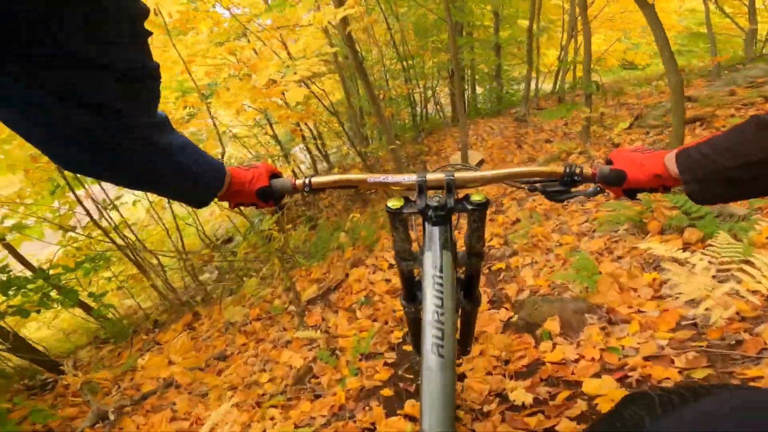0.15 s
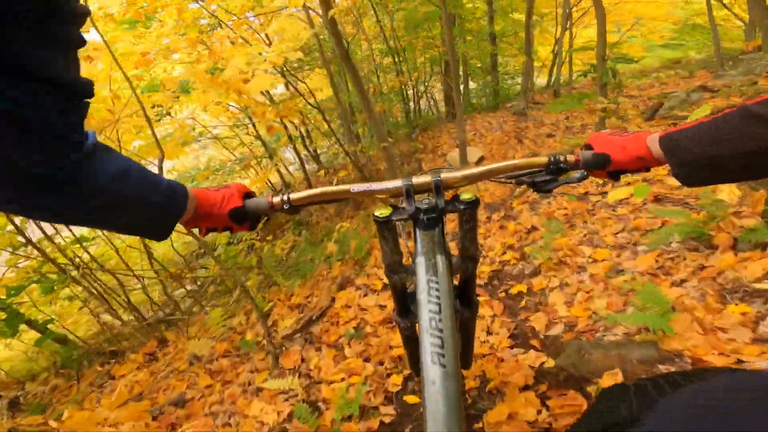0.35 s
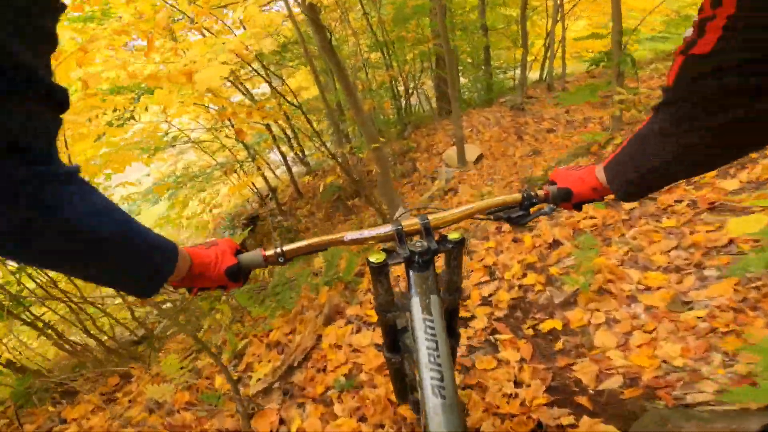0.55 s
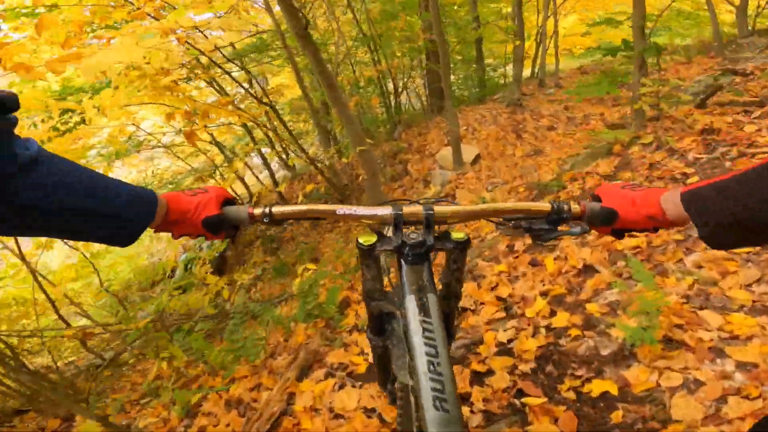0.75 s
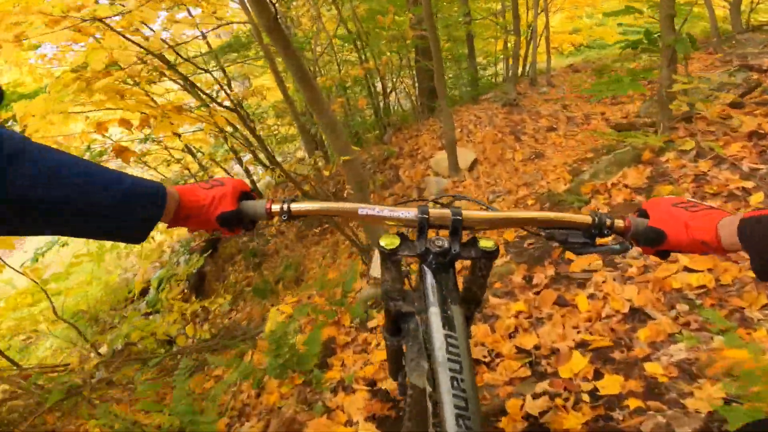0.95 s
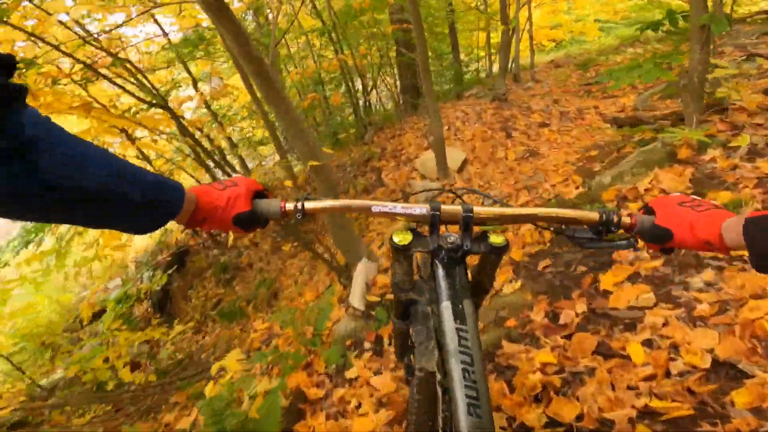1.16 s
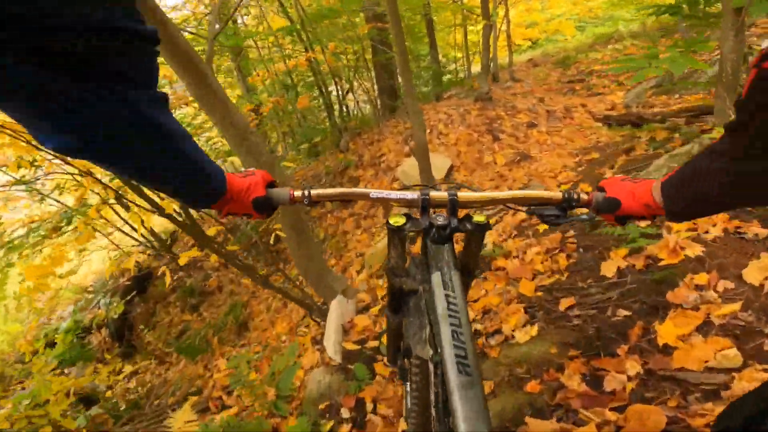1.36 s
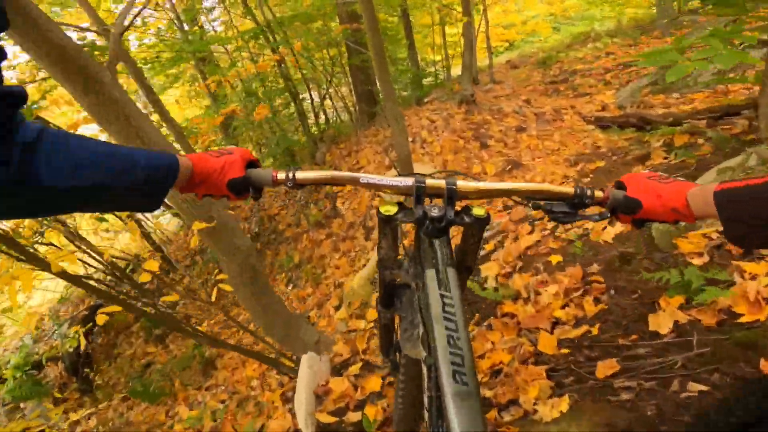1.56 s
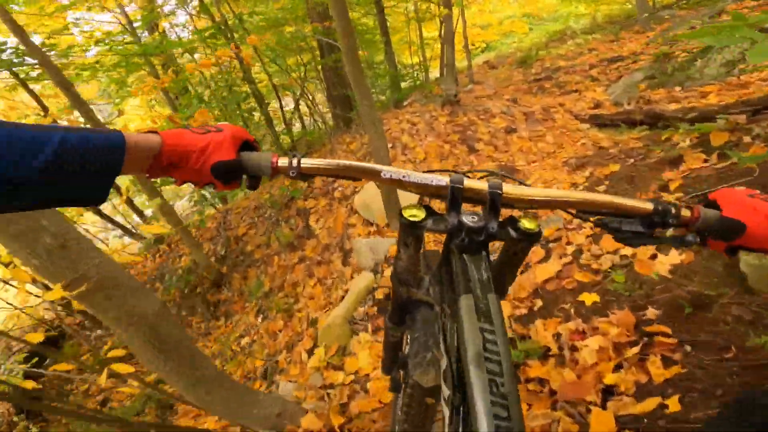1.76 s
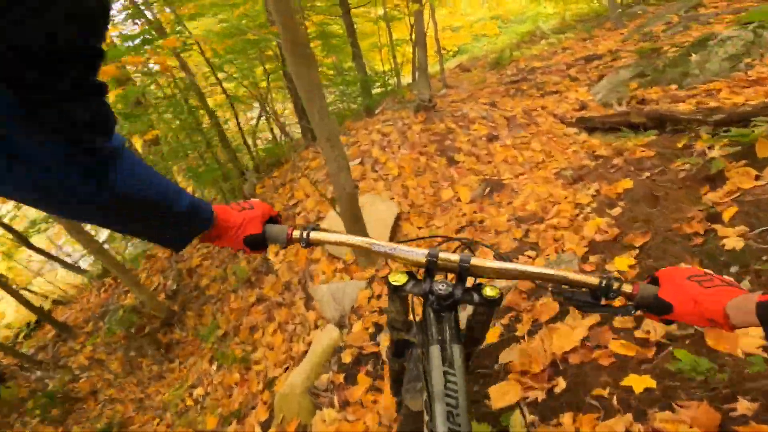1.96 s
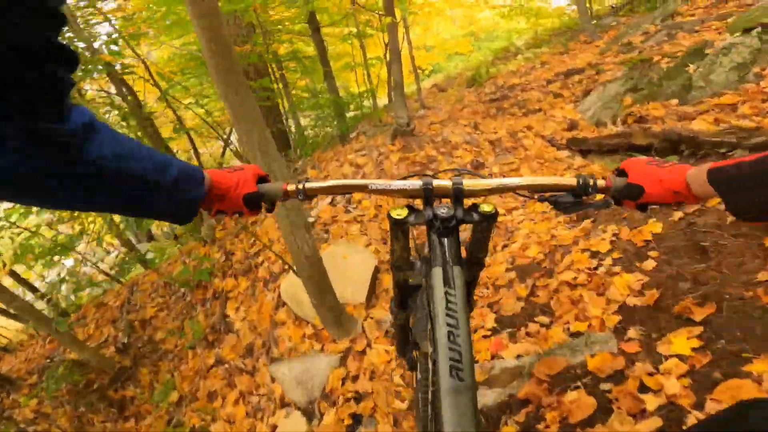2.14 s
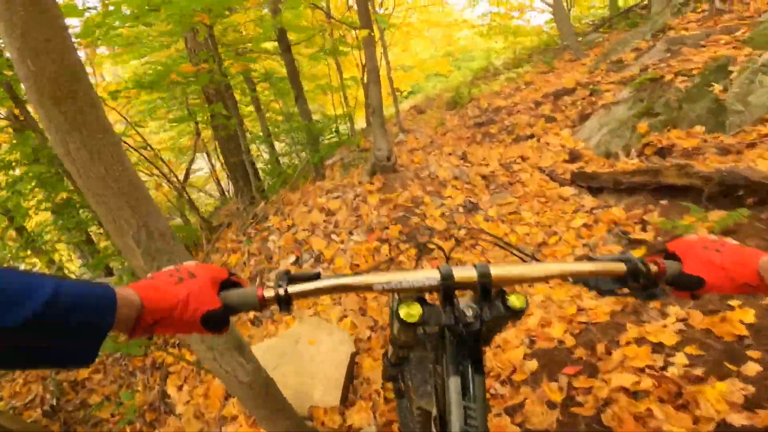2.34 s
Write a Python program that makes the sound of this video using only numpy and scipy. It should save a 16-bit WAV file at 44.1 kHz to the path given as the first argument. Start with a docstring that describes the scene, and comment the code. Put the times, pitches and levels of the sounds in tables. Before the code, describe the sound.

A mountain bike crunches through deep dry leaves on a forest trail, heard from the rider's chest. Bumps bring rattles, knocks and low thuds, twigs snap and the tyres buzz briefly. After a late thud, the leaves swell loudest.

```python
"""A mountain bike rolls down a forest trail deep in dry leaves, heard from the rider's chest.
From the start the tyres crush leaves and stems; each bump crunches harder, rattles the bike,
drums the tyres and shakes the camera. The frame knocks and blows thud through the suspension.
Twigs snap from 0.28 s, and from 0.4 s the tyre knobs buzz over roots in short runs.
Near 2 s a rock thuds, then the leaves swell to their loudest."""
import sys
import numpy as np
from scipy import signal
from scipy.fft import rfft, irfft, next_fast_len
from scipy.io import wavfile
from scipy.ndimage import uniform_filter1d, map_coordinates

SR = 44100
rng = np.random.default_rng(int(sys.argv[2]) if len(sys.argv) > 2 else 0)


def bounce(signal):
    """Save signal as a 16-bit WAV file at the path given by the first command-line argument."""
    frames = np.transpose(np.atleast_2d(signal))
    limited = np.clip(frames, -1, 1)
    pcm = np.round(limited * 32767).astype(np.int16)
    wavfile.write(sys.argv[1], SR, pcm)


N = 110117
TIME_S = np.arange(N) / SR


def amp(db):
    return 10 ** (np.asarray(db) / 20)


def unit_rms(x):
    return x / np.sqrt(np.mean(x ** 2) + 1e-20)


def at_hz(points, hz):
    """Interpolate (frequency, value) points on a log axis."""
    freqs, values = np.transpose(points)
    return np.interp(np.log(hz + 1), np.log(freqs + 1), values)


def filtered(x, response):
    """Apply the gain response(hz)."""
    size = next_fast_len(N + 8192)
    return irfft(rfft(x, size) * response(np.fft.rfftfreq(size, 1 / SR)), size)[..., :N]


def impulse_response(spectrum, size=4096):
    """Minimum-phase response with the given spectrum."""
    cepstrum = irfft(np.log(amp(at_hz(spectrum, np.fft.rfftfreq(size, 1 / SR)))))
    cepstrum[1:size // 2] *= 2
    cepstrum[size // 2 + 1:] = 0
    return irfft(np.exp(rfft(cepstrum)))


def add(track, start_s, sound):
    i = max(round(start_s * SR), 0)
    track[i:i + len(sound)] += sound[:max(N - i, 0)]


def grains(spectrum, per_s, scatter_db, noise_share):
    """Tiny random impacts over smooth noise, rms 1."""
    hits = (rng.random(N) < per_s / SR) * np.sign(rng.standard_normal(N))
    hits *= amp(scatter_db * np.clip(rng.standard_normal(N), -2, 2))
    force = np.sqrt(1 - noise_share) * unit_rms(hits) + np.sqrt(noise_share) * rng.standard_normal(N)
    return unit_rms(signal.fftconvolve(force, impulse_response(spectrum))[:N])


def steadied(x, window_s):
    """Divide by the running rms."""
    return x / np.sqrt(np.abs(uniform_filter1d(x ** 2, int(window_s * SR))) + 1e-6)


def wobble(samples, knots_per_s=134.5):
    """Smooth random curve."""
    return map_coordinates(rng.standard_normal(1024), [np.arange(samples) * knots_per_s / SR], mode="wrap")


# leaf crackle spectrum (frequency [Hz], density [dB])
LEAF_SPECTRUM = [(200, -19), (600, -1), (1100, -1.5), (1900, -4.5), (3000, 0.5), (5000, 0), (7400, -4.5),
                 (8300, -11), (10500, -16), (13000, -19), (14500, -73)]
def leaves(gain):
    """Dry leaves crackle under the tyres, stems breaking among them."""
    return gain * (grains(LEAF_SPECTRUM, per_s=5000, scatter_db=10.5, noise_share=.36) + stems())


def stems(count=900, per_s=150, centre_hz=3522, spread_octaves=.8, cycles_per_20db=14):
    """Stems and small twigs break at random, each a tiny pitched tick."""
    out, t = np.zeros(N), TIME_S[:600]
    times_s = np.cumsum(rng.exponential(1, count)) / per_s
    for start_s, (pitch, size) in zip(times_s, np.clip(rng.standard_normal((count, 2)), -2, 2)):
        hz = centre_hz * 2 ** (spread_octaves * pitch)
        db = -3 + 6 * size + at_hz(LEAF_SPECTRUM, hz)
        add(out, start_s, amp(db - 20 * hz * t / cycles_per_20db) * np.sin(2 * np.pi * hz * t))
    return out


LEAF_REF_DB = -41
# shattering leaf spectrum (frequency [Hz], density [dB])
SHARD_SPECTRUM = [(1500, -30), (3500, -2.5), (5500, 0.5), (7500, 0), (8500, -5.5), (11000, -10),
                  (14000, -33)]
def shards(crunch_gain, db_per_db=1.51):
    """Leaves shatter under load: a bright hiss that grows faster than the crunch."""
    gain = amp(-52) * (crunch_gain / amp(LEAF_REF_DB)) ** db_per_db
    return gain * grains(SHARD_SPECTRUM, per_s=5000, scatter_db=2, noise_share=.36)


# deep litter envelope (time [s], level [dB])
LITTER_LEVELS = [(0, -49), (.25, -33.5), (.42, -38), (.56, -42), (.68, -37.5), (.85, -44.5), (.96, -35),
                 (1.08, -64), (1.32, -41), (1.6, -76), (1.95, -58), (2.12, -37.5), (2.5, -54)]
# deep litter spectrum (frequency [Hz], density [dB])
LITTER_SPECTRUM = [(300, -11), (900, -4.5), (1400, 8.5), (2200, 2), (3000, -2.5), (5000, -26)]
def litter():
    """Deep leaf litter gives way with a lower crunch."""
    gain = amp(np.interp(TIME_S, *np.transpose(LITTER_LEVELS)))
    return gain * grains(LITTER_SPECTRUM, per_s=700, scatter_db=8, noise_share=.57)


# chain and cable spectrum (frequency [Hz], density [dB])
RATTLE_SPECTRUM = [(150, -11.5), (400, -4.5), (620, -6.5), (790, -8.5), (900, -2), (1000, 0), (1120, -3.5),
                   (1250, -3), (1400, -12.5), (1700, -9.5), (2000, -12), (3000, -20.5), (6000, -37.5)]
def rattle(gain):
    """Chain and cables clatter and scrape."""
    return gain * grains(RATTLE_SPECTRUM, per_s=700, scatter_db=5, noise_share=.57)


# tyre spectrum (frequency [Hz], density [dB])
DRUM_SPECTRUM = [(40, -27.5), (85, -6), (120, -0.5), (155, -3.5), (190, 1.5), (225, -7), (270, -1.5),
                 (340, -12.5), (480, -14.5), (700, -24.5), (1500, -57.5)]
def tyre_drum(gain):
    """Lumps in the ground drum the tyres into a low roar."""
    roar = grains(DRUM_SPECTRUM, per_s=500, scatter_db=1, noise_share=.46)
    return gain * steadied(roar, window_s=.0426)


# shake spectrum (frequency [Hz], density [dB])
SHAKE_SPECTRUM = [(8, -30), (22, 0.5), (45, -1), (70, 4.5), (110, -16), (250, -63.5)]
def camera_shake(gain):
    """The camera shakes on the rider's chest: a deep rumble."""
    rumble = filtered(rng.standard_normal(N), lambda hz: amp(at_hz(SHAKE_SPECTRUM, hz)))
    return gain * steadied(unit_rms(rumble), window_s=.045)


# leaves under the rolling tyres (time [s], level [dB])
LEAF_LEVELS = [(0, -68), (.08, -38), (.2, -37.5), (.36, -42.5), (.56, -42), (.7, -36), (.86, -36.5),
               (.96, -36.5), (1.04, -41.5), (1.12, -42.5), (1.22, -39), (1.32, -38.5), (1.41, -33.5),
               (1.5, -41), (1.6, -38.5), (1.64, -33), (1.78, -40.5), (1.93, -43.5), (2.02, -32),
               (2.11, -28.5), (2.26, -37.5), (2.41, -44), (2.5, -36)]
# bumps (crest time [s], rise [s], fall [s], crunch [dB], rattle [dB], drum [dB], shake [dB])
TRAIL_BUMPS = [ (0.013, 0.036, 0.043, -32, -27.5, -18, -18), (0.241, 0.037, 0.038, -37, -24, -25.5, -32),
               (0.281, 0.03, 0.024, -33.5, -30, -25, -29), (0.332, 0.017, 0.031, -34.5, -41, -27.5, -21),
               (0.371, .015, 0.085, -36.5, -34.5, -37.5, -32), (0.627, 0.031, 0.037, -31, -26, -24, -22),
               (.680, 0.022, 0.033, -48, -37, -25.5, -33), (.945, 0.015, 0.053, -37, -38, -35, -40),
               (.997, 0.026, 0.014, -32, -24, -23, -26), (1.120, 0.075, 0.048, -65, -30.5, -28.5, -47),
               (1.158, 0.015, 0.014, -31.5, -25.5, -19, -38),
               (1.208, 0.031, 0.033, -32.5, -26, -22.5, -18.5), (1.375, .020, 0.016, -55, -41, -50, -50),
               (1.434, 0.0078, 0.014, -35.5, -29.5, -24.5, -32),
               (1.464, 0.021, 0.027, -51, -41, -27.5, -26), (1.515, 0.002, 0.042, -45, -35.5, -36, -28),
               (1.662, 0.011, .020, -47, -56, -42, -27.5), (1.705, 0.0099, 0.024, -30.5, -47, -28, -40),
               (1.733, 0.015, 0.023, -32, -23, -21.5, -32), (1.632, 0.0062, 0.0057, -36, -48, -40, -38),
               (1.803, 0.036, 0.056, -36, -30, -32.5, -33), (1.978, 0.011, 0.048, -37, -30.5, -24, -27),
               (2.075, 0.048, 0.031, -36, -34, -27, -27), (2.223, 0.043, 0.042, -50, -56, -29, -42),
               (2.342, 0.011, 0.036, -38, -35.5, -58, -36), (2.46, 0.035, 0.037, -30.5, -25, -23, -23.5), ]
def ride():
    """All rolling layers; each bump adds a swell of power to crunch, rattle, drum and shake."""
    leaf_db = np.interp(TIME_S, *np.transpose(LEAF_LEVELS))
    excess_db = leaf_db - LEAF_REF_DB
    rattle_db, drum_db, shake_db = -42.5 + .59 * excess_db, -41 + .14 * excess_db, np.full(N, -38)
    power = amp([leaf_db, rattle_db, drum_db, shake_db]) ** 2
    for crest_s, rise_s, fall_s, *levels_db in TRAIL_BUMPS:
        width_s = np.where(TIME_S < crest_s, rise_s, fall_s)
        swell = np.exp(-np.abs((TIME_S - crest_s) / width_s) ** 1.29)
        power += (amp(levels_db)[:, None] * swell) ** 2
    crunch_gain, rattle_gain, drum_gain, shake_gain = np.sqrt(power)
    ground = leaves(crunch_gain) + shards(crunch_gain) + litter()
    return ground + rattle(rattle_gain) + tyre_drum(drum_gain) + camera_shake(shake_gain)


# frame modes (frequency [Hz], level [dB])
FRAME_MODES = [(640, -30), (900, -20.5), (1000, 1.5), (1090, -15), (1250, -19), (1480, -9), (1720, -18.5)]
# hard knocks (time [s], peak [dB], pitch [ratio], t60 [s])
FRAME_KNOCKS = [(.029, -19, 1, .03), (.0462, -10, 1.03, .026), (.602, -21, .95, .02),
                (.648, -7.5, 1.1, .014), (.935, -26, 1, .08), (.989, -18, 1.05, .035), (1.210, -20, 1, .04),
                (1.460, -21, .95, .04), (1.509, -22, .95, .05), (1.718, -18, 1, .09), (1.729, -14, 1, .07),
                (1.826, -12.5, 1, .028), (1.8755, -23, 1.65, .015), (1.978, -13, .95, .025),
                (1.9818, -10, .7, .02), (1.9825, -15, .42, .02), (2.1165, -15, 1.04, .012)]
def frame_knocks(attack_s=.0003, scatter_db=2.9):
    """Each knock rings the frame's damped modes."""
    out, t = np.zeros(N), TIME_S[:SR // 8]
    for start_s, db, ratio, t60_s in FRAME_KNOCKS:
        modes = np.zeros(len(t))
        for hz, mode_db in FRAME_MODES:
            gain = amp(mode_db + rng.normal(0, scatter_db))
            modes += gain * np.sin(2 * np.pi * (hz * ratio * t + .33 * rng.random()))
        knock = amp(-60 * t / t60_s) * (1 - np.exp(-t / attack_s)) * modes
        add(out, start_s, amp(db) * knock / np.abs(knock).max())
    return out


# dull blows (time [s], level [dB], pitch [Hz], t60 [s])
DULL_BLOWS = [(0.041, -4, 114, 0.018), (0.192, -9.5, 65, 0.029), (0.242, -17, 180, .04),
              (.264, -17, 150, 0.023), (0.317, -11.5, 56.2, 0.1), (.672, -16.5, 119, 0.064),
              (1, -12.5, 53.2, 0.23), (1.02, -20, 114, 0.096), (1.126, -9.5, 194, 0.079),
              (1.144, -8, 194, 0.07), (1.919, -13, 45.4, 0.2), (1.9819, 2, 231, 0.016),
              (2.238, -15, 35.3, .12)]
def thuds():
    """Blows through tyres and suspension, each a few heavily damped low swings."""
    out, t = np.zeros(N), TIME_S[:SR // 4]
    for start_s, db, hz, t60_s in DULL_BLOWS:
        add(out, start_s, amp(db - 60 * t / t60_s) * np.sin(2 * np.pi * hz * t))
    return out


# twig and stone cracks (time [s], level [dB], centre [Hz], t60 [s])
CRACKS = [(.2753, -16.5, 2390, 0.012), (.324, -22.5, 4330, .012), (0.3419, -13, 9900, .011),
          (.346, -31, 9900, .04), (1.303, -24, 2700, .016), (1.373, -35, 2000, .02),
          (1.435, -22, 4470, 0.035), (1.631, -20, 6900, .018), (1.963, -28, 6160, .015),
          (1.976, -21.5, 6600, 0.019), (2.1165, -14, 5940, 0.018), (2.255, -29, 3670, 0.027)]
def snaps(attack_s=.0004, width_octaves=.2, broadband_db=-3.5):
    """Twigs snap and stones flick: bright noise bursts with one broad resonance."""
    out, t = np.zeros(N), TIME_S[:2048]
    hz = np.fft.rfftfreq(len(t), 1 / SR) + 1
    for start_s, db, centre_hz, t60_s in CRACKS:
        resonance = np.exp(-.5 * (np.log2(hz / centre_hz) / width_octaves) ** 2)
        broadband = amp(broadband_db) / (1 + (hz / centre_hz) ** 4)
        noise = unit_rms(irfft(rfft(rng.standard_normal(len(t))) * (resonance + broadband)))
        add(out, start_s, amp(db - 60 * t / t60_s) * (1 - np.exp(-t / attack_s)) * noise)
    return out


# buzz overtones (harmonic [number], level [dB])
BUZZ_OVERTONES = [(2, -2), (3, -36), (4, -16)]
# runs (time [s], length [s], start rate [Hz], end rate [Hz], level [dB], overtone gain [dB])
BUZZ_RUNS = [(0.398, 0.16, 106, 125, -34, -8), (.610, 0.051, 140, 125.6, -12.5, 0),
             (1.082, 0.08, 121, 147, -15.5, -4.5), (1.456, 0.019, 221, 200, -19, -13),
             (1.512, 0.019, 200, 226, -23, -11.5), (1.747, 0.079, 192, 189, -32, -9)]
def knob_buzz(rate_jitter=.082, flutter_db=3.5):
    """Tread blocks hit roots and hard ground in quick succession: a rough, low buzz."""
    out = np.zeros(N)
    for start_s, length_s, start_hz, end_hz, db, overtones_db in BUZZ_RUNS:
        progress = np.linspace(0, 1, int(length_s * SR))
        rate_hz = (start_hz + (end_hz - start_hz) * progress) * (1 + rate_jitter * wobble(len(progress)))
        phase = 2 * np.pi * np.cumsum(rate_hz) / SR
        overtones = sum(amp(level_db) * np.sin(k * phase) for k, level_db in BUZZ_OVERTONES)
        swell = np.abs(np.sin(np.pi * progress)) ** .48
        gain = amp(db + flutter_db * wobble(len(progress)))
        add(out, start_s, swell * gain * (np.sin(phase) + amp(overtones_db) * overtones))
    return out


# stereo width of the ground scatter (frequency [Hz], side over mid [dB])
SCATTER_WIDTH = [(30, -9), (80, -12), (170, -18), (300, -22), (750, -14), (1000, -16), (1400, -11),
                 (2100, -8.5), (3300, -10.5), (4000, -18), (5400, -25), (6300, -20), (7200, -14),
                 (10500, -11), (12500, -5)]
def scene():
    """The bike is straight ahead; sound scattered from the ground differs left and right."""
    direct = ride() + frame_knocks() + thuds() + snaps() + knob_buzz()
    scattered = filtered(ride() + frame_knocks() + snaps(), lambda hz: amp(at_hz(SCATTER_WIDTH, hz)))
    return np.array([direct + scattered, direct - scattered])


# microphone port balance (frequency [Hz], left over right [dB])
PORT_BALANCE = [(30, -2), (90, -.4), (330, 1), (700, 3), (1000, 3.6), (1500, 1.5), (2100, -1.2), (2700, -1),
                (3300, .1), (6200, .4), (7300, 2.6), (10000, 3), (13500, 0)]
# microphone port phase (frequency [Hz], left lead [rad])
PORT_PHASE = [(450, 0), (900, -.4), (1200, -.75), (1900, -.8), (2300, -.45), (3200, -.27), (4000, 0)]
def record(dry, ceiling_db=-2.5, highpass_hz=8, top_hz=14400):
    """The two ports differ in level and phase; peaks round off; the band is limited."""
    sides = np.array([[.5], [-.5]])

    def port_response(hz):
        return amp(sides * at_hz(PORT_BALANCE, hz)) * np.exp(1j * sides * at_hz(PORT_PHASE, hz))

    ports = filtered(dry, port_response)
    rounded = ports / (1 + np.abs(ports / amp(ceiling_db)) ** 6) ** (1 / 6)
    return filtered(rounded, lambda hz: (hz < top_hz) * hz / (hz - 1j * highpass_hz))


dry = scene()
out = record(dry)
bounce(out)
```